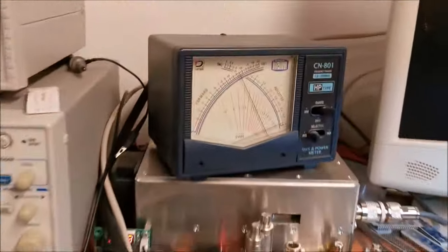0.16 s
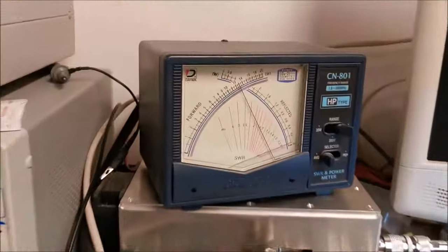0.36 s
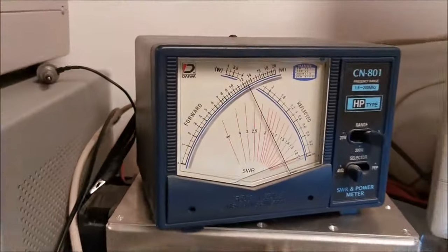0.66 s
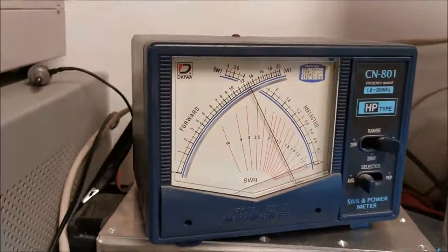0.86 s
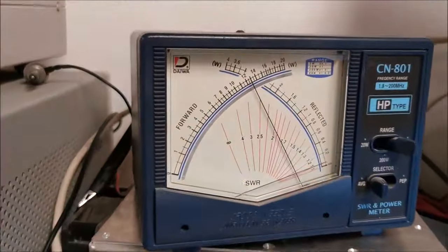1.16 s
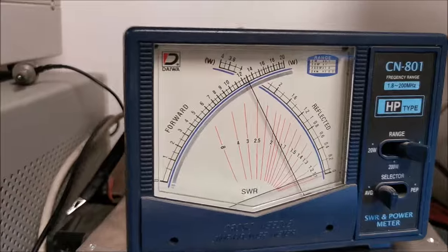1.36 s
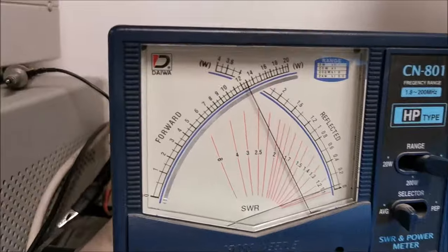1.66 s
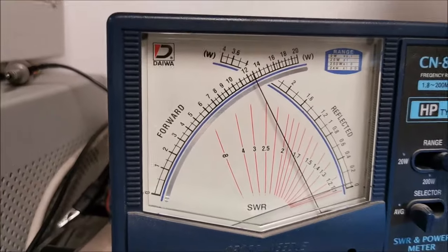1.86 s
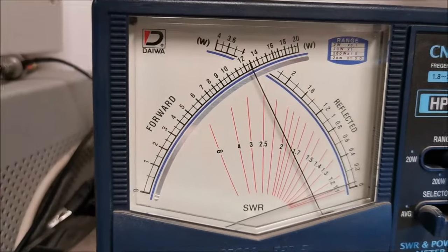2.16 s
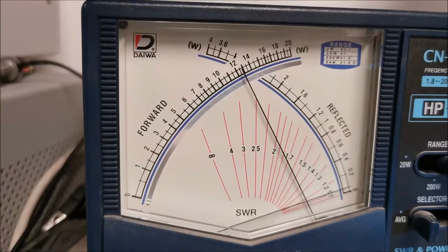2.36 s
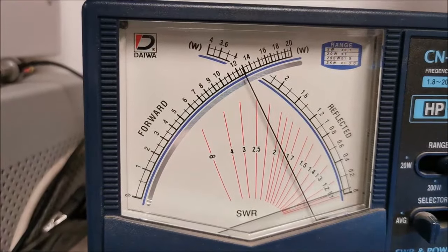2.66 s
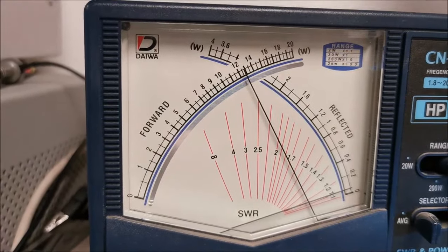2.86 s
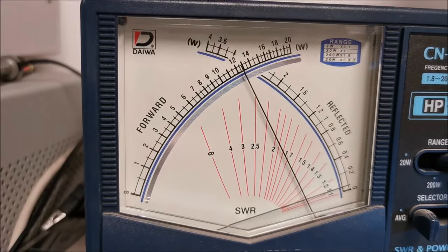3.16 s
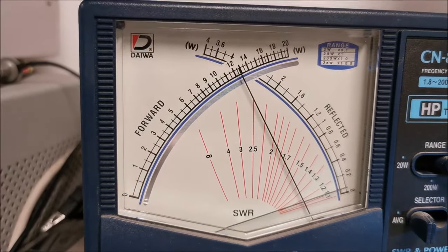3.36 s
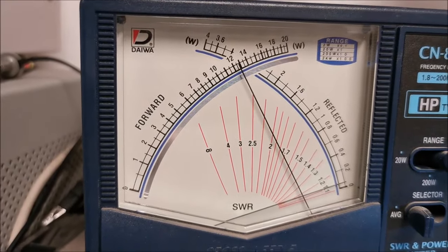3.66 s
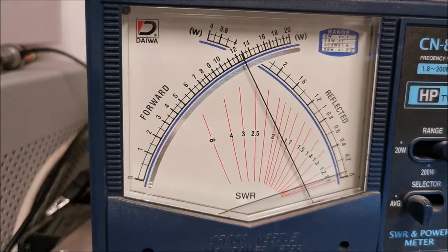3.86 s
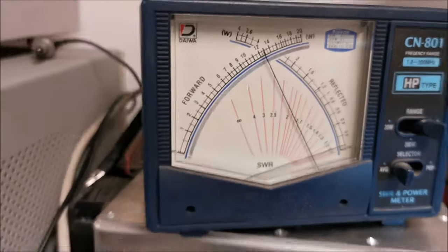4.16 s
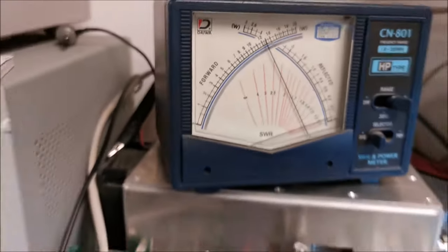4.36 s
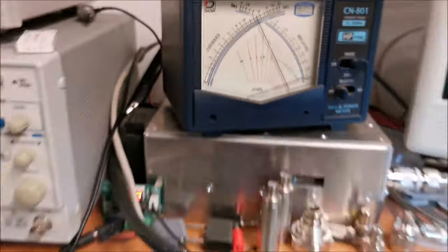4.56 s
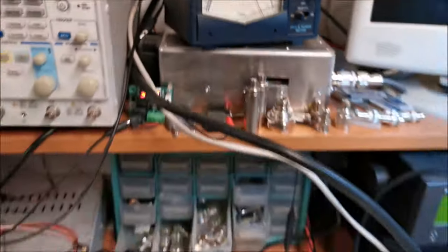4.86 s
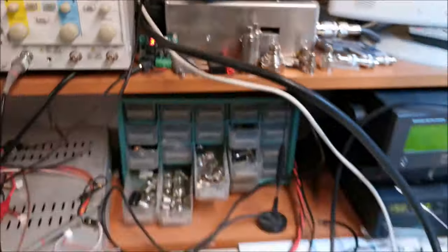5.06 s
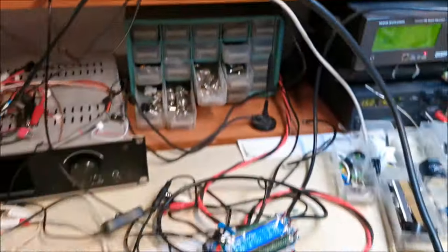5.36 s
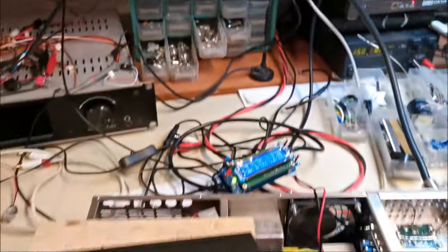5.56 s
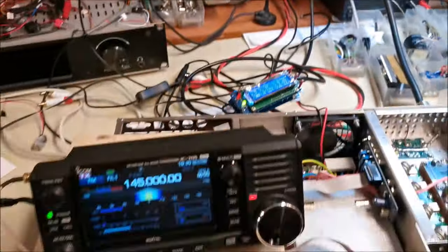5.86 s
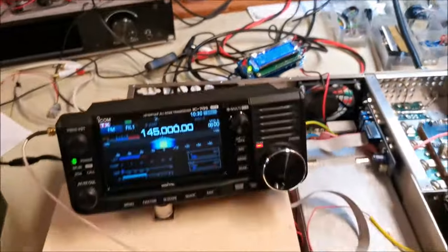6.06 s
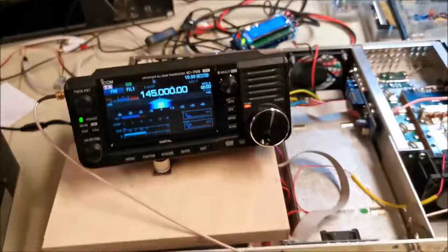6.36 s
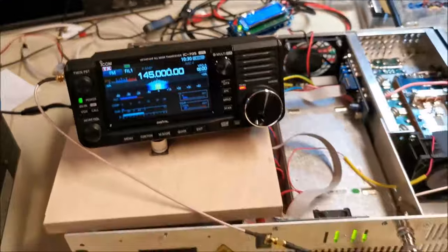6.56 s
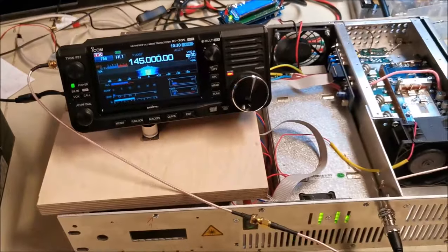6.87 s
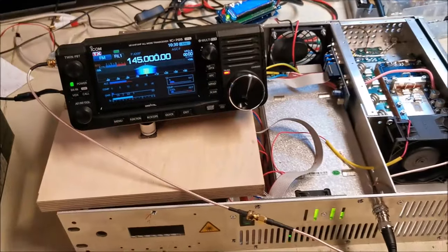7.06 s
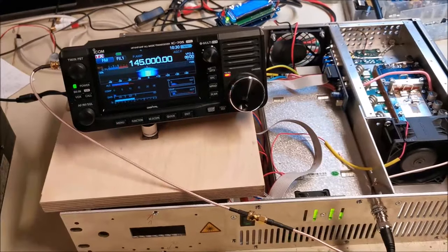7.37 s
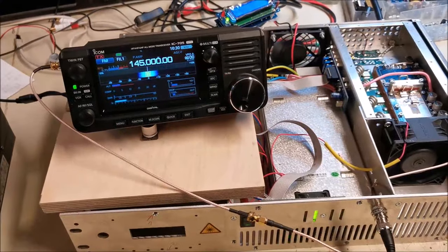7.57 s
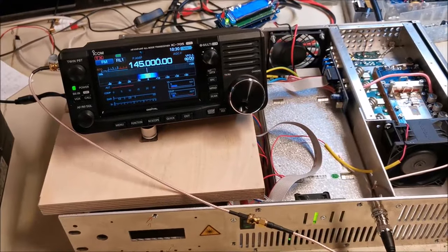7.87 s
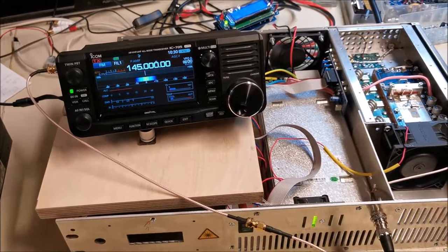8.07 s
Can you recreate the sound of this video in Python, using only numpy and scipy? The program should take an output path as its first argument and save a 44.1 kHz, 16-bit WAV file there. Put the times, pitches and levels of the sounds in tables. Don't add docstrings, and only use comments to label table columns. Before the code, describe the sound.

Close stereo fan noise on a workbench: a high, reedy whine around 1.4 kilohertz, hissing airflow, hollow ringing and two sharp finger ticks.

```python
import sys
import numpy as np
from scipy import signal
from scipy.io import wavfile
from scipy.ndimage import uniform_filter1d

SR = 44100
rng = np.random.default_rng(int(sys.argv[2]) if len(sys.argv) > 2 else 0)


def master_out(mix):
    frames = np.transpose(np.atleast_2d(mix))
    ceiling = np.clip(frames, -1, 1)
    pcm = np.round(ceiling * 32767).astype(np.int16)
    wavfile.write(sys.argv[1], SR, pcm)


def level_to_linear(level):
    exponent = np.asarray(level, float) / 20
    return 10 ** exponent


N = 362138


def evened(x):
    return x / np.sqrt(np.mean(abs(x) ** 2) + 1e-20)


def read(points, hz):
    f, value = np.transpose(points)
    return np.interp(np.log(hz + 1), np.log(f + 1), value)


def follow(rows, t):
    s, *columns = np.transpose(rows)
    return np.array([np.interp(t, s, c) for c in columns])


def spots(rows, t):
    total = 0
    for s, half_width, left_db, right_db in rows:
        total = total + np.array([[left_db], [right_db]]) * np.exp(-((t - s) / half_width) ** 2)
    return total


# (time [s], shaft speed [turns/s])
SHAFT_SPEED = [(0, 154.6), (.8, 154.3), (2, 154.45), (2.8, 154.9), (4.3, 155.2), (5, 155.55), (6, 155.47),
               (8.21, 155.68)]


def shaft_speed(t):
    return follow(SHAFT_SPEED, t)[0]


def flutter(hz, lag_hz):
    hop = 32
    coarse = np.arange(N // hop + 2)
    r = np.exp(-2 * np.pi * hz * hop / SR)
    z = rng.standard_normal((3, len(coarse))) + 1j * rng.standard_normal((3, len(coarse)))
    z = signal.lfilter([1], [1, -2 * r, r * r], z)
    z = z * np.exp(-2j * np.pi * lag_hz * coarse * hop / SR)
    shared, *each = z
    return evened(np.array([np.interp(np.arange(N) / hop, coarse, shared + .5 * own) for own in each]))


def order(turns, multiple, left_db, right_db, lead, rough, flutter_hz, lag_hz=0):
    still = 0 * turns
    tone = np.exp(2j * np.pi * multiple * turns + 1j * np.array([lead + still, still]))
    level = level_to_linear(np.array([left_db + still, right_db + still]))
    shaken = level * tone * (1 + rough * flutter(flutter_hz, lag_hz))
    return np.sqrt(2 / (1 + rough ** 2)) * shaken.real


# (time [s], left level [dB], right level [dB], left lead [rad])
BLADE_TONE = [(0, -53, -46, -1.8), (.3, -62, -41.5, -0.51), (.55, -57, -43.5, -1.7), (.8, -54, -48.5, -1.8),
              (1.1, -48.5, -59, 0.84), (1.35, -47.5, -52, 0.041), (1.6, -45.5, -44.5, -0.19),
              (2, -45.5, -40, .2), (2.6, -45, -38, .2), (4.25, -45.5, -38.5, .2), (4.6, -58, -40, 1),
              (4.8, -49, -41.5, -1.7), (5.05, -62, -53, 1), (5.35, -55, -40, -1.9), (5.7, -54, -42.5, -1.5),
              (6, -60, -49, -1.3), (7.3, -59, -48, -0.85), (8.21, -71, -61, 0)]
# (time [s], half width [s], left level [dB], right level [dB])
BLADE_TONE_NODES = [(.19, 0.011, -3, -21), (.98, 0.069, -4, -21), (2.38, 0.034, -5, -4),
                    (4.46, 0.093, -5, -17), (4.86, .03, -5, -6), (5, 0.022, -3, -10), (5.135, 0.02, 4, 6),
                    (5.2, 0.016, -6, -10), (6.82, 0.087, -1, -16), (7.16, 0.068, -13, -13),
                    (7.71, 0.058, -3, -15), (7.93, 0.064, -5, -11)]
# (left level [dB], right level [dB])
SECOND_MEAN = (-64, -59)
# (time [s], half width [s], left level [dB], right level [dB])
SECOND_SWELLS = [(0, 0.57, -2, 6.5), (.75, 0.24, 0, 1), (2.5, 0.32, 3, 6.5), (3.36, 0.25, 0, 7.5),
                 (4.45, 0.08, 4, 7.5), (5, 0.095, 10, 8), (5.8, 0.82, -8, 7), (6.6, 0.35, 4, -16),
                 (7.4, .3, 5, 3.5), (7.84, 0.19, 1, -10)]
# (left level [dB], right level [dB])
THIRD_MEAN = (-72, -70)
# (time [s], half width [s], left level [dB], right level [dB])
THIRD_SWELLS = [(.65, 0.33, 9, 7.2), (1.9, 0.22, 3, 11), (4.2, 0.35, 1, 11), (5.5, 0.36, 4, 11),
                (7.5, .5, 0, 8)]


def blade_tones(turns, t):
    left_db, right_db, lead = follow(BLADE_TONE, t)
    first = np.array([left_db, right_db]) + spots(BLADE_TONE_NODES, t)
    second = np.reshape(SECOND_MEAN, (2, 1)) + spots(SECOND_SWELLS, t)
    third = np.reshape(THIRD_MEAN, (2, 1)) + spots(THIRD_SWELLS, t)
    out = order(turns, 9, *first, lead, rough=0.17, flutter_hz=26.5, lag_hz=14)
    out += order(turns, 18, *second, lead=1.45, rough=0.64, flutter_hz=40.8, lag_hz=8)
    return out + order(turns, 27, *third, lead=.1, rough=0.81, flutter_hz=45)


# (time [s], left level [dB], right level [dB], left lead [rad])
POLE_TONE = [(0, -58, -68, 3.3), (.2, -56, -64, 3.5), (.4, -59, -49, 1.5), (.75, -58, -53, 1.3),
             (1, -63, -66, 1.2), (1.4, -69, -68, 1.9), (1.9, -60, -56, 2.6), (2.4, -58, -56, 2.9),
             (4.3, -64, -55, 2.2), (4.75, -57, -51, 7.4), (5.15, -54, -57, 11.8), (5.4, -51, -49, 12.2),
             (6, -52, -53, 14.5), (7, -54.5, -52.5, 12.5), (8.21, -53.5, -49.5, 13.1)]
# (time [s], half width [s], left level [dB], right level [dB])
POLE_TONE_NODES = [(4.4, .05, -10, 0), (4.6, 0.079, 2, -12), (4.92, 0.076, -16, -6), (5.12, .06, -4, -6),
                   (5.5, 0.055, -5, -2)]


def pole_tone(turns, t):
    left_db, right_db, lead = follow(POLE_TONE, t)
    level_db = np.array([left_db, right_db]) + spots(POLE_TONE_NODES, t)
    return order(turns, 8, *level_db, lead, rough=0.14, flutter_hz=14)


# (time [s], left level [dB], right level [dB])
UNBALANCE_TONE = [(0, -70, -72), (1.9, -67, -67.5), (3.7, -67.5, -67.5), (5.4, -70.5, -73),
                  (8.21, -71, -75.5)]
# (multiple of shaft speed [1], left level [dB], right level [dB])
FAINT_ORDERS = [(2, -90, -87), (12, -73.5, -67.5), (14, -83, -65.5), (36, -75, -71), (45, -71.5, -82),
                (54, -96, -105)]


def shaft_orders(turns, t):
    out = order(turns, 1, *follow(UNBALANCE_TONE, t), lead=0.28, rough=0.06, flutter_hz=3.3)
    for multiple, left_db, right_db in FAINT_ORDERS:
        out += order(turns, round(multiple), left_db, right_db, lead=0.91, rough=0.59, flutter_hz=12.0)
    return out


# (time [s], left level [dB], right level [dB])
SMALL_FAN_TONE = [(0, -68, -66), (1, -76, -60.5), (2, -83, -65), (4, -79, -70), (4.6, -71, -59.5),
                  (5.4, -66, -67), (6.2, -80, -79), (8.21, -94, -92)]


def small_fan(t):
    return order(752 * t, 1, *follow(SMALL_FAN_TONE, t), lead=.1, rough=0.87, flutter_hz=8.0)


# (frequency [Hz], level [dB])
LOW_HUM = [(20.45, -67), (40.9, -73.5)]


def low_hum(t):
    return sum(np.sqrt(2) * level_to_linear(db) * np.sin(2 * np.pi * hz * t) for hz, db in LOW_HUM)


def fan_tones():
    t = np.arange(N) / SR
    turns = np.cumsum(shaft_speed(t)) / SR
    return blade_tones(turns, t) + pole_tone(turns, t) + shaft_orders(turns, t) + small_fan(t) + low_hum(t)


# (time [s], added left delay [ms], share of treble likeness kept [0-1],
# bench echo notch [Hz])
PHONE_AIM = [(0, 0.036, 0.72, 280), (.5, 0.01, 1, 230), (1.4, 0.03, 1, 212), (2, 0, 0.6, 223),
             (4.3, 0.014, 0.79, 220), (4.8, 0.057, .95, 229), (5.2, 0.044, 1, 304), (5.6, 0.094, 0.87, 342),
             (6, 0.14, 0.6, 368), (6.8, 0.13, 0.26, 434), (8.2, 0.086, 0.8, 425)]


def phone_aim(t):
    delay_ms, kept, notch_hz = follow(PHONE_AIM, t)
    return delay_ms, kept, notch_hz, (notch_hz - notch_hz.min()) / np.ptp(notch_hz)


# (time [s], case mode level [dB])
CASE_VIEW = [(0, 3), (.8, 2.5), (1.3, 1), (2.8, -1.5), (4, -1.5), (5.15, 5), (5.6, 2), (7.2, -0.5),
             (8.21, 1)]


def case_view(t):
    return follow(CASE_VIEW, t)[0]


def hump(hz, centre, width, left_db, right_db):
    return level_to_linear(np.array([left_db, right_db]))[:, None, None] ** 2 / (1 + (2 * (hz - centre) / width) ** 2)


FELT = np.array([.6, 1.2])[:, None, None]
# (level before tilting down [dB], change once tilted down [dB])
LOW_RUSH_LEVEL = (0.94, -3.5)


def low_rush_db(down):
    level, change = LOW_RUSH_LEVEL
    return level + change * down


# (frequency [Hz], level [dB per Hz])
RUSH_LEFT = [(30, -93), (70, -93.5), (125, -99.5), (210, -93), (300, -90.5), (510, -95), (620, -104),
             (1100, -86), (2000, -91), (4300, -90.5), (7000, -91), (8500, -95), (11000, -100.5),
             (15800, -102)]
# (frequency [Hz], level [dB per Hz])
RUSH_RIGHT = [(30, -99), (90, -103), (200, -99.5), (300, -91), (520, -93.5), (1000, -87.5), (2300, -80.5),
              (3500, -84.5), (5600, -85), (6900, -97), (7500, -108), (10800, -100), (13500, -114),
              (14200, -130), (15800, -115)]
# (time [s], half width [s], left level [dB], right level [dB])
SHELF_SHADOW = [(5.53, 0.3, -4, -6)]


def air_rush(hz, t, down):
    shading = np.interp(hz, [110., 160., 500., 1400., 2500., 2900., 3400.],
                        [0.16, 0.23, -1.2, 1.4, 0.52, -0.54, 0.2])
    treble = np.clip(np.log2(hz / 5500 + 1e-9), 0, 1)
    treble_db = 1 + spots(SHELF_SHADOW, t)[:, None]
    coloured = np.array([read(RUSH_LEFT, hz), read(RUSH_RIGHT, hz)])
    return level_to_linear(coloured + FELT * (shading * low_rush_db(down) + treble * treble_db))


# (multiple of shaft speed [1], width [Hz], left level [dB per Hz], right level [dB per Hz])
WAKE_HUMPS = [(8.946, 39, -75.5, -69), (8.38, 81, -82, -81), (17.8, 170, -87.5, -83),
              (19.3, 130, -99, -81.5), (43.8, 210, -92.5, -103)]
# (level before tilting down [dB], change once tilted down [dB])
THIRD_WAKE_LEVEL = (-1.26, 3.35)
# (level before tilting down [dB], change once tilted down [dB])
FOURTH_WAKE_LEVEL = (-0.54, -16)
# (time [s], half width [s], left level [dB], right level [dB])
FAN_REVEAL = [(5.6, 0.39, 2, 2.5)]


def blade_wake(hz, t, down):
    shaft = shaft_speed(t)
    level, change = THIRD_WAKE_LEVEL
    third_db = level + change * down + spots(FAN_REVEAL, t)[:, None]
    level, change = FOURTH_WAKE_LEVEL
    fourth_db = level + change * down + 1.5 * case_view(t)
    power = sum(hump(hz, multiple * shaft, *rest) for multiple, *rest in WAKE_HUMPS)
    power += hump(hz, 27.1 * shaft, 360, -88.5, -84.5) * level_to_linear(2.0 * FELT * third_db) ** 2
    return power + hump(hz, 36 * shaft, 450, -97, -90) * level_to_linear(1.9 * FELT * fourth_db) ** 2


# (frequency [Hz], width [Hz], left level [dB per Hz], right level [dB per Hz])
BENCH_MODES = [(1540, 26, -80, -87), (2220, 54, -99, -81)]
# (time [s], level [dB per Hz])
LOW_BENCH_MODE = [(0, -85), (.8, -87), (3, -84), (4.9, -88), (5.3, -95), (8.21, -96)]


def bench(hz, t, down):
    ringing = sum(hump(hz, *mode) for mode in BENCH_MODES) * level_to_linear(1.3 * low_rush_db(down)) ** 2
    return ringing + hump(hz, 97, 12.6, 0.1, -2.0) * level_to_linear(follow(LOW_BENCH_MODE, t)[0]) ** 2


# (frequency [Hz], width [Hz], left level [dB per Hz], right level [dB per Hz])
CASE_MODES = [(578, 27, -93, -87), (625, 12, -93, -92), (670.4, 27, -83.5, -78.5), (795, 29, -88.5, -83.5),
              (923, 135, -91.5, -88.5)]


def hollow_case(hz, t):
    felt = np.array([1.9, 1.4])[:, None, None]
    return sum(hump(hz, *mode) for mode in CASE_MODES) * level_to_linear(felt * case_view(t)) ** 2


# (frequency [Hz], likeness [0-1])
AIR_LIKENESS = [(40, 1), (200, 0.88), (700, 0.85), (1300, 0.52), (2200, 0.25), (3200, 0.34), (6000, 0.15),
                (15000, 0)]
# (frequency [Hz], lead [rad])
AIR_LEAD = [(0, 3), (690, -0.5), (1210, -0.07), (1460, -0.5), (1810, -1.2), (2500, -0.1), (2840, 0.1),
            (3190, 1.5), (4650, 2.5), (6980, 6.5), (8960, 1), (10500, 18.1), (14100, 21), (15400, 28.1)]


def air():
    frames, hz = N // 512 + 5, np.fft.rfftfreq(2048, 1 / SR)[:, None]
    t = np.arange(frames) * 512 / SR
    delay_ms, kept, notch_hz, down = phone_aim(t)
    power = air_rush(hz, t, down) ** 2 + blade_wake(hz, t, down) + bench(hz, t, down) + hollow_case(hz, t)
    notch = level_to_linear(-7 * np.exp(-(np.log(hz / notch_hz + 1e-9) / .22) ** 2))
    a, b, c, d, left_patch, right_patch = rng.standard_normal((frames, 1025, 6)).T
    patches = uniform_filter1d(np.array([left_patch, right_patch]), 24, 1)
    patches = evened(uniform_filter1d(patches, 30, 2))
    same = np.clip(read(AIR_LIKENESS, hz) * np.where(hz > 1500, kept, 1), -1, 1)
    turn = np.exp(-1j * read(AIR_LEAD, hz) + 2j * np.pi * hz * delay_ms / 1000)
    left = a + 1j * b
    right = same * turn * left + np.sqrt(1 - same ** 2) * (c + 1j * d)
    z = np.array([left, right]) * np.sqrt(power) * notch * level_to_linear(1.42 * patches)
    per_hz = np.sqrt(SR / 2048) * 0.94
    return per_hz * signal.istft(z, nperseg=2048, noverlap=1536)[1][:, :N]


# (time [s], peak level [dB], push [ms], sign [+-1], left share [dB])
FINGER_KNOCKS = [
    (.0742, -48, .8, 1, -12),
    (.0805, -46, .5, 1, -12),
    (.0833, -45, .6, -1, -12),
    (.6033, -25.5, .28, -1, -26),
    (2.1231, -29, .25, -1, -22),
    (6.562, -54, 2.2, -1, 1),
    (6.595, -56, 2.2, 1, 1),
    (6.775, -58, 2.2, -1, 1),
    (6.81, -59, 2.2, 1, 1),
]


def knocks():
    t, out = np.arange(N) / SR, np.zeros((2, N))
    for s, db, ms, sign, left_db in FINGER_KNOCKS:
        push = np.exp(-.5 * ((t - s) * 1000 / ms) ** 2)
        rebound = 0.16 * np.exp(-.5 * ((t - s - .003) * 1000 / ms) ** 2)
        out += sign * level_to_linear(db) * (push + rebound) * level_to_linear(np.array([[left_db], [0]]))
    spring = signal.iirfilter(2, 75., btype="high", ftype="butter", fs=SR)
    return 1.14 * signal.lfilter(*spring, out)


def scene():
    return fan_tones() + air() + knocks()


def low_pass(x):
    return signal.sosfilt(signal.butter(12, 15750, fs=SR, output="sos"), x)


def record(dry):
    return low_pass(dry)


dry = scene()
out = record(dry)
master_out(out)
```